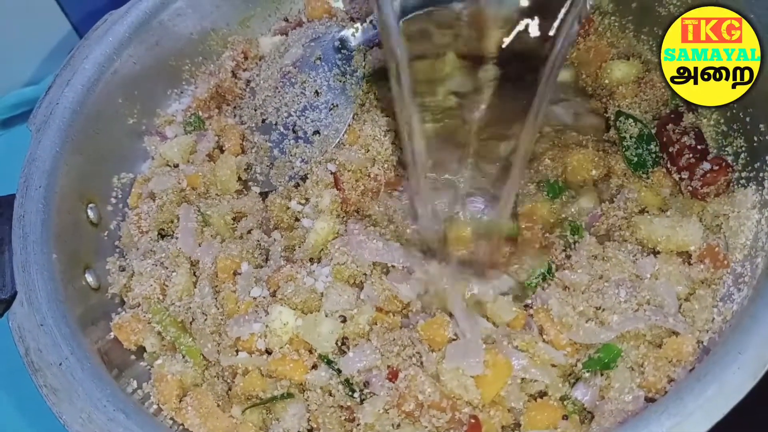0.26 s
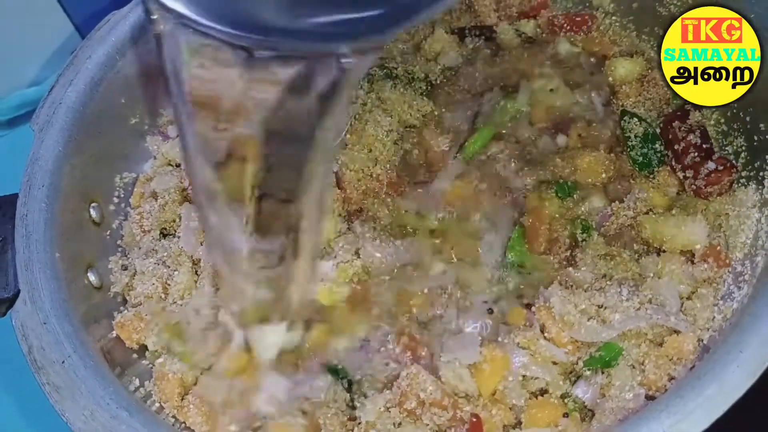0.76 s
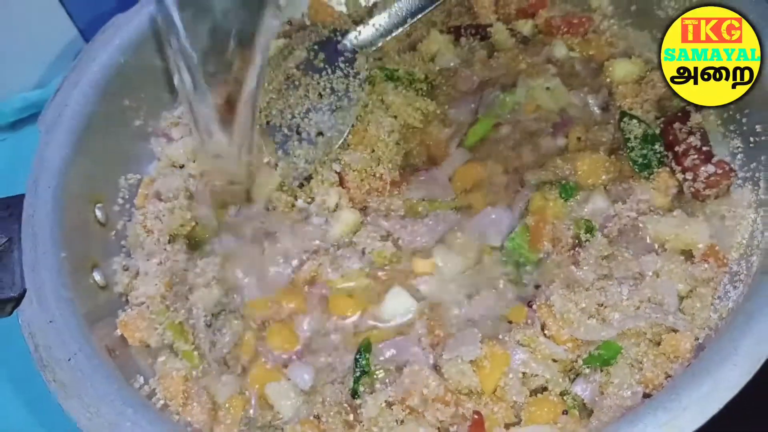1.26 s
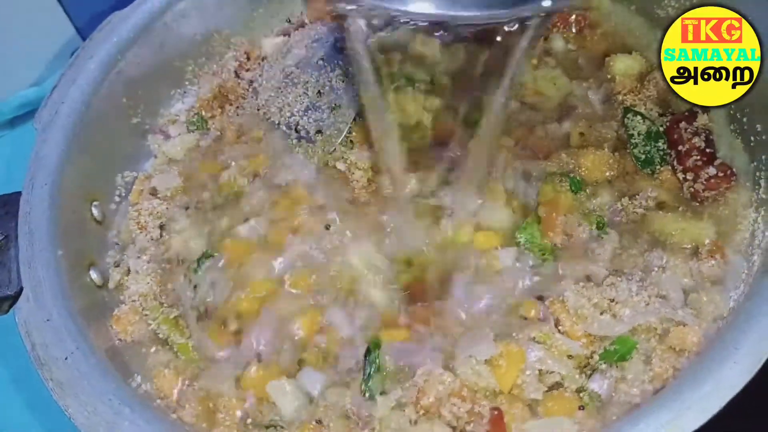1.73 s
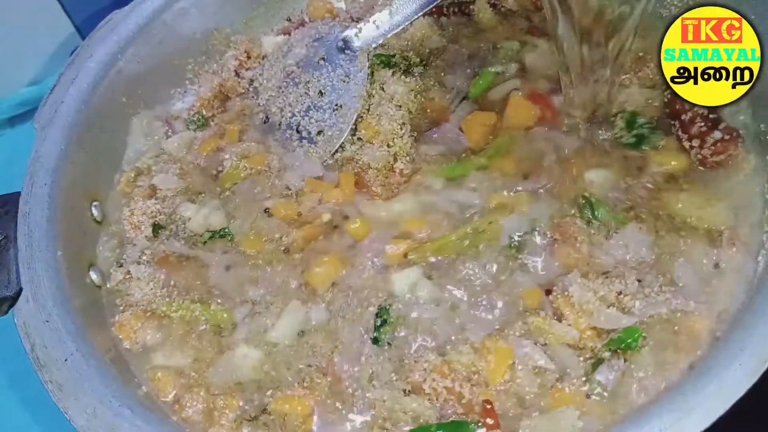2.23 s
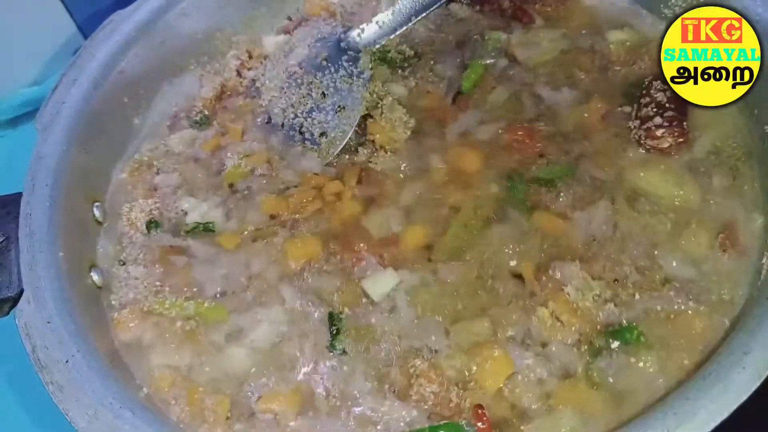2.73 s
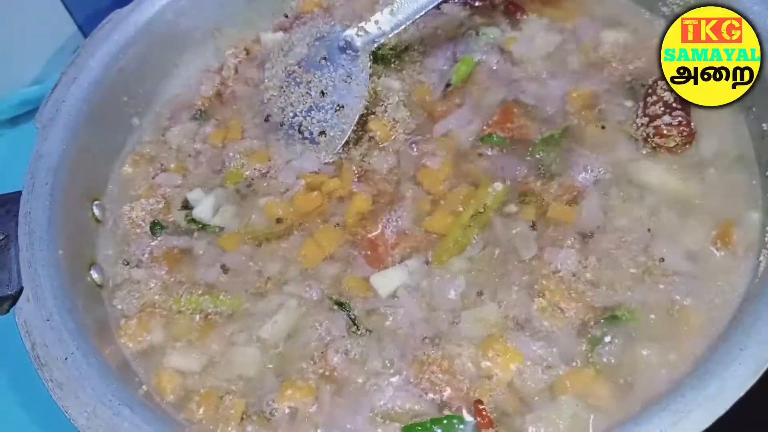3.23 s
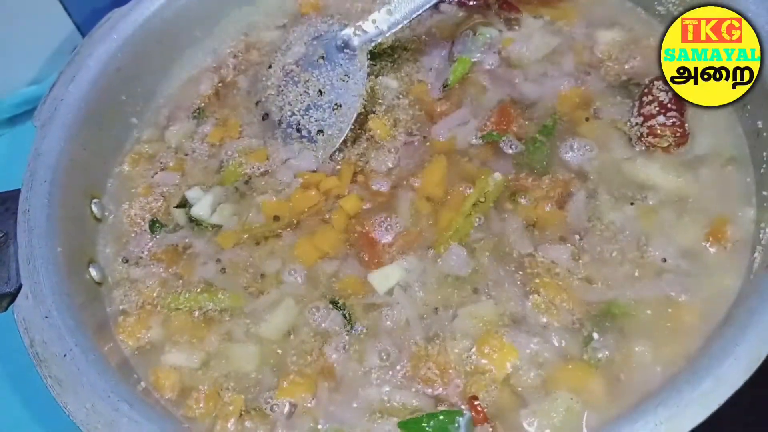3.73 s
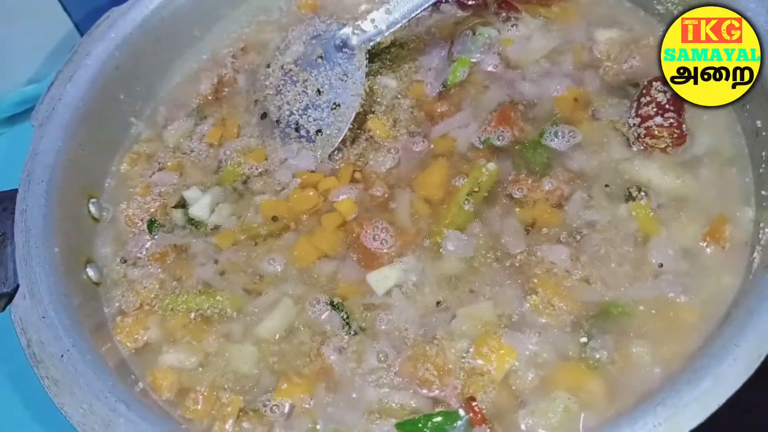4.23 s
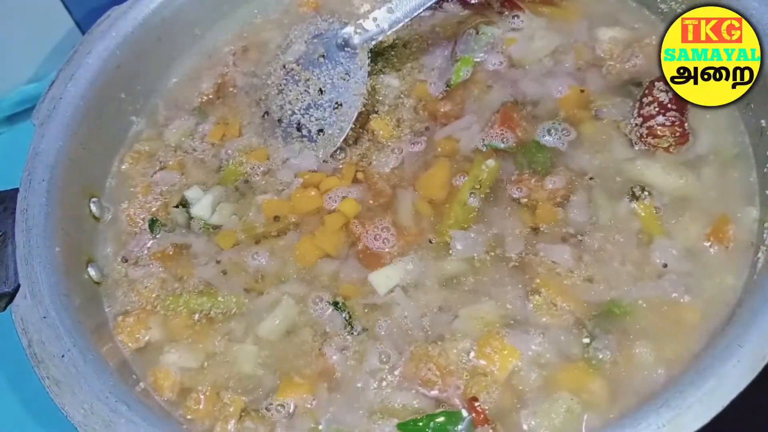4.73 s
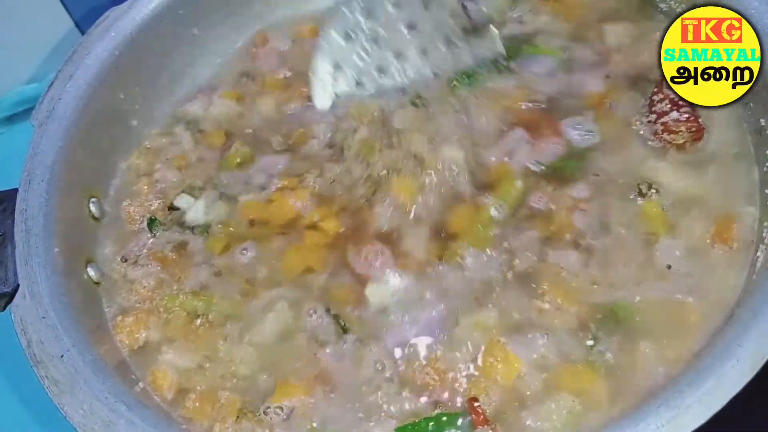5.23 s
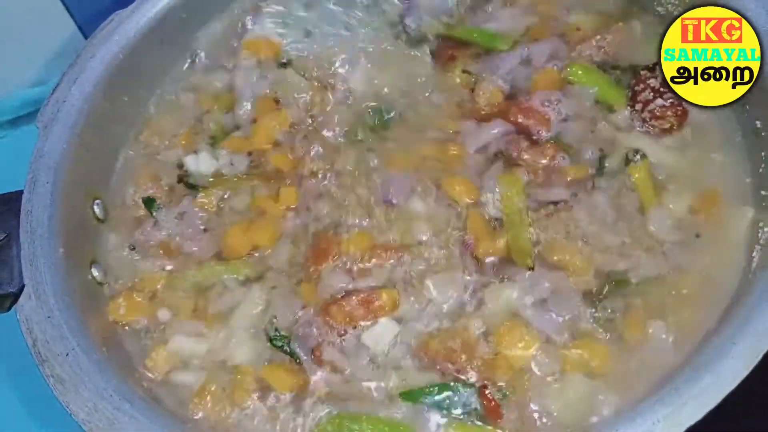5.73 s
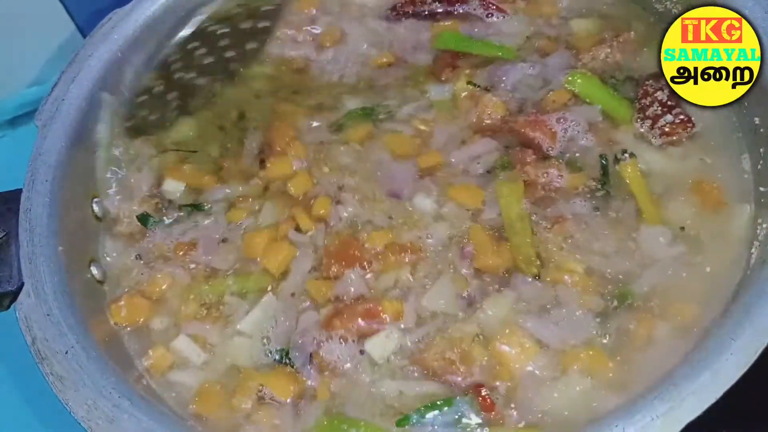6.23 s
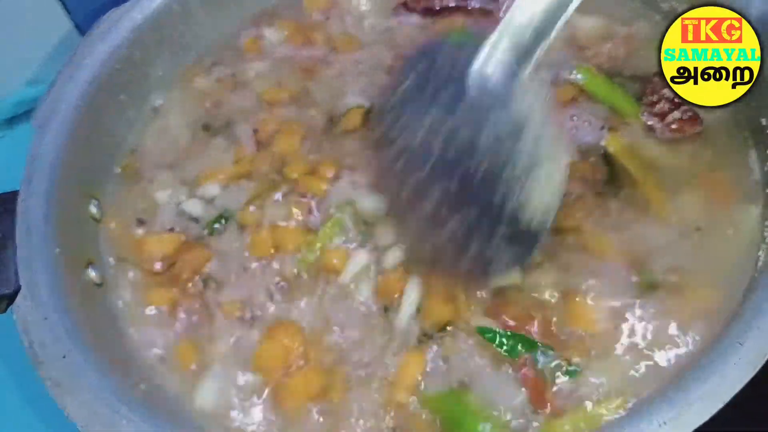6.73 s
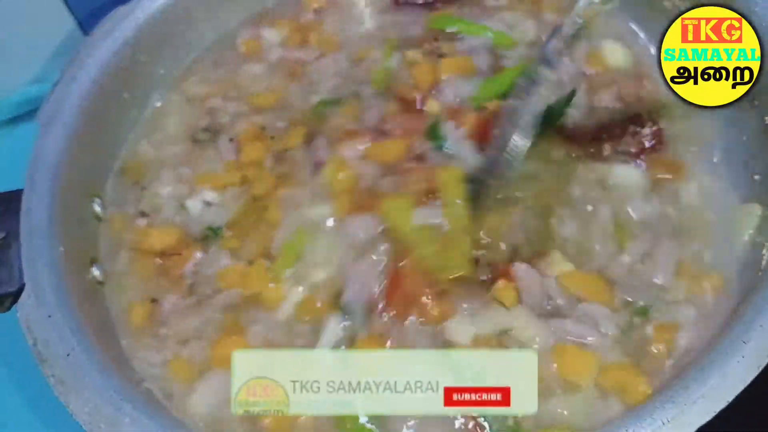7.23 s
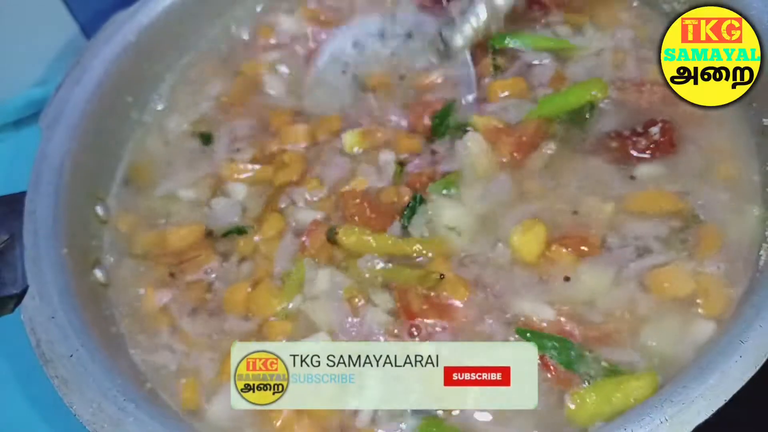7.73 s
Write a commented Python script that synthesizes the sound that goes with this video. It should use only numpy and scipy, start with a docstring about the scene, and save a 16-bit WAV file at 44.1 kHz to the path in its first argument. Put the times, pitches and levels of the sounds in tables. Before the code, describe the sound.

A phone held over the pan hears a bright, dense sizzle under a splashing, bubbling stream for over three seconds. The pour tapers off, leaving near quiet, then a thin metal vessel lands with a rattling clang. Faint watery stirring follows, with dull bumps, a short scrape and hard ladle clanks on the pan wall. Low rumble and a thin burner hiss remain in the live kitchen.

```python
"""Vegetables sizzle in a hot metal pan as water is poured on them: bursts of steam roar, then thin to a simmer.
The stream patters, splashes, slaps, gurgles and drags bubbles under; noise and clicks excite its resonances.
The emptied steel vessel clatters down, and a slotted ladle slops, scrapes, ticks and knocks: cracks and modes.
Dull bumps, rumble, a burner's hiss and room noise fill a small hard-walled kitchen, heard by a phone over the pan."""
import sys
import numpy as np
from scipy import signal
from scipy.fft import rfft, irfft
from scipy.io import wavfile
from scipy.ndimage import uniform_filter1d

SR = 44100
rng = np.random.default_rng(int(sys.argv[2]) if len(sys.argv) > 2 else 0)


def unload_wav(signal):
    """Save mono or channel-first audio to the path in sys.argv[1] as 16-bit WAV at rate SR, clipped to [-1, 1]."""
    wavfile.write(
        sys.argv[1],
        SR,
        np.round(np.clip(np.atleast_2d(signal).T, -1, 1) * 32767).astype(np.int16),
    )


N = 351918
TIME = np.arange(N) / SR
TOP_HZ = 15750  # upper limit of what is heard

# strength of the stream, which builds, tapers as the vessel empties, and trickles out: time_s, level_db
STREAM = [(0, -28.5), (.13, -26), (.25, -26.5), (.35, -24.5), (1.03, -24.5), (1.3, -25), (1.8, -26.5),
          (2.3, -27.5), (2.6, -30), (2.95, -30.5), (3.3, -30.5), (3.5, -33.5), (3.77, -37.5), (3.86, -40),
          (4.2, -46)]
# strokes of the ladle through the broth: middle_s, length_s, slop_db, fresh_sizzle_db
STROKES = [(4.923, 0.32, -55, -65.5), (5.1, 0.11, -54, -61), (5.32, 0.09, -54.5, -72.5),
           (5.46, .09, -59.5, -73), (5.607, 0.1, -60.5, -61.5), (5.805, .07, -56.5, -58.5),
           (5.924, 0.083, -51.5, -52), (6.03, .07, -58.5, -63), (6.72, 0.21, -52.5, -60),
           (6.94, 0.092, -56.5, -69), (7.421, 0.1, -54.5, -68), (7.57, 0.065, -58.5, -65.5),
           (7.694, 0.076, -61.5, -79.5), (7.798, 0.068, -59.5, -80.5), (7.918, 0.06, -61, -85.5)]


def undb(db):
    """Amplitude ratio of a level in decibels."""
    return 10 ** (np.asarray(db) / 20)


def unit(x):
    """Scale to a mean power of 1."""
    return x / np.sqrt(np.mean(x ** 2))


def fade(t, t60):
    """Exponential decay, by 60 dB in t60."""
    return np.exp(-np.log(1000) * t / t60)


def swell(middle, length):
    """A bell-shaped (Gaussian) rise and fall of amplitude."""
    return np.exp(-2 * ((TIME - middle) / length) ** 2)


def curve(rows, axis):
    """Linear interpolation in time of one column of a table."""
    rows = np.asarray(rows)
    return np.interp(TIME, rows[:, 0], rows[:, axis])


def walk(rate):
    """Smoothed random steps, rate a second: a slow fluctuation with a spread near 1."""
    k = int(SR / rate)
    steps = np.repeat(rng.standard_normal(N // k + 1), k)
    return 1.3 * uniform_filter1d(uniform_filter1d(steps, k), k)[:N]


def add(out, s, x):
    """Superpose x on out from time s."""
    i = int(s * SR)
    out[i:i + len(x)] += x[:N - i]


def colour(x, spectrum, tilt_db=0):
    """Minimum-phase filter of unit energy through (hz, db) points, tilted by dB per octave."""
    size = 4096
    octave = np.log2(np.maximum(np.fft.rfftfreq(size, 1 / SR), 1))
    hz, db = np.transpose(spectrum)
    tilt = tilt_db * np.clip(octave, np.log2(hz[0]), np.log2(hz[-1]))
    db = np.interp(octave, np.log2(hz), db) + tilt
    # folding the cepstrum onto positive times makes the response causal
    cepstrum = irfft(np.log(undb(db)))
    cepstrum[1:size // 2] *= 2
    cepstrum[size // 2 + 1:] = 0
    response = irfft(np.exp(rfft(cepstrum)))
    return signal.fftconvolve(x, response / np.linalg.norm(response))[:len(x)]


def pops(rate, spread_db):
    """Poisson-like random clicks, rate a second, mostly small and a few large; mean power 1."""
    sizes = undb(spread_db * np.minimum(rng.exponential(size=N), 5))
    happens = rng.random(N) < rate / SR
    return unit(happens * sizes * rng.choice([-1, 1], N) / np.sqrt(rate))


def rising_tones(count, low_hz, high_hz, cycles, glide):
    """Decaying sines at random times, each rising in pitch by the share glide; mean power 1."""
    out = np.zeros(N)
    for when, pitch, size in rng.random((count, 3)):
        hz = low_hz * (high_hz / low_hz) ** pitch
        age = np.linspace(0, 1, int(SR * cycles / hz))  # fraction of its life
        tone = np.sin(2 * np.pi * cycles * age * (1 + glide * age / 2))
        add(out, when * N / SR, undb(10.3 * size) * fade(age, 1.0) * tone)
    return unit(out)


def room(x, wet_db, t60=0.98, count=40):
    """Reverberation: direct sound plus wall echoes, whose pattern changes as bursts wander over the pan."""
    out, t = np.zeros(N), TIME[:SR // 2]
    for part in np.array_split(np.arange(N), count):
        tail = rng.standard_normal(len(t)) * fade(t, t60) * (t > .004)
        add(out, TIME[part[0]], signal.fftconvolve(x[part], tail / np.linalg.norm(tail)))
    return (x + undb(wet_db) * out) / np.hypot(1, undb(wet_db))


def band(hz, width, wander=0.035):
    """Noise in one resonance (modulated narrow-band noise), whose pitch wanders as the water shifts."""
    low_pass = signal.butter(3, width / 2, fs=SR, output="sos")
    slow = signal.sosfilt(low_pass, rng.standard_normal((2, N)))
    phase = 2 * np.pi * hz * np.cumsum(1 + wander * walk(9)) / SR
    return unit(slow[0] * np.cos(phase) + slow[1] * np.sin(phase))


def ring(modes, tilt_db, split):
    """Modal decay: each mode is a close pair that beats; every blow favours other modes."""
    t = TIME[:SR // 2]
    hz, db, t60 = np.transpose(modes)[:, :, None]
    chance = rng.standard_normal((2, len(modes), 1))
    gains = undb(db + tilt_db * np.log2(hz) + 1.9 * chance[0])
    first, second = 2 * np.pi * rng.random((2, len(modes), 1))
    split_hz = hz * (1 + split * chance[1])
    pair = np.sin(2 * np.pi * hz * t + first) + 0.99 * np.sin(2 * np.pi * split_hz * t + second)
    # each mode builds up over about one cycle
    envelope = fade(t, t60) * (1 - np.exp(-hz * t)) ** 2
    return np.sum(gains * pair * envelope, axis=0) / np.linalg.norm(gains)


def blows(hits, body, modes, crack_t60, wet_db, room_t60, ring_db, split, ripple_db, spot_t60):
    """Impact: a crack of crowded modes, its room echo, a short clang of the struck spot, and lasting modes."""
    out, t = np.zeros(N), TIME[:SR]
    # crowded modes leave peaks and gaps that stay the same from blow to blow
    hz = np.arange(100, TOP_HZ, 70)
    body_hz, body_db = np.transpose(body)
    ripple = ripple_db * np.clip(rng.standard_normal(len(hz)), -2, 1.5) * np.minimum(hz / 1500, 1)
    spectrum = np.column_stack([hz, np.interp(np.log(hz), np.log(body_hz), body_db) + ripple])
    for s, db, tilt_db, lasting_db, spot_hz, spot_db in hits:
        # separate reflections off the hard walls make the echo grainy
        grain = unit(undb(3.5 * np.repeat(rng.standard_normal(SR // 100), 100)))
        echo = undb(wet_db + 0.8 * lasting_db) * fade(t, room_t60) * grain
        envelope = np.hypot(fade(t, crack_t60), echo)
        crack = colour(rng.standard_normal(SR) * envelope, spectrum, tilt_db)
        clang = np.sin(2 * np.pi * spot_hz * t) * fade(t, spot_t60) * (1 - np.exp(-spot_hz * t / 2))
        add(out, s, undb(db) * crack)
        add(out, s, undb(spot_db) * clang)
        add(out, s, undb(db + lasting_db + ring_db) * ring(modes, tilt_db, split))
    return out


def frying():
    """Boiling as shot noise: steam pockets burst on hot metal and, drowned, thin to single crackles."""
    # boiling on the hot metal, drowned as the water rises: time_s, sizzle_db, fine_spray_db
    boil = [(0, -26.5, -36), (.35, -25.5, -36.5), (1.05, -24, -30.5), (1.8, -25.5, -35),
            (2.4, -25.5, -34.5), (3.2, -29, -36), (3.55, -33.5, -41), (4.2, -49.5, -60), (5.05, -55, -67),
            (5.45, -64.5, -73), (6.15, -71.5, -88), (6.7, -58.5, -63.5), (7.0, -64.5, -74),
            (7.4, -58.5, -83), (7.75, -90, -98)]
    # spectra of the sizzle and the fine spray: frequency_hz, density_db_per_hz
    sizzle_spectrum = [(2180, -41), (3700, -12), (4420, -2), (5120, -8), (5990, 1.5), (6910, -5),
                       (8500, -17), (9240, -38), (10000, -37.5), (13000, -45.5), (22000, -120)]
    spray_spectrum = [(5290, -47), (9000, -2.5), (9280, -11), (9900, -3), (11400, -8.5), (14800, 4),
                      (15700, 3)]
    # each stroke of the ladle bares a little hot metal
    bared = sum(undb(db) * swell(s, length) for s, length, _, db in STROKES)
    bared_spray_db = -17  # relative to the bared sizzle
    sizzle_gain = np.hypot(undb(curve(boil, axis=1)), bared)
    spray_gain = np.hypot(undb(curve(boil, axis=2)), undb(bared_spray_db) * bared)
    vigour = sizzle_gain / sizzle_gain.max()
    rate = 3000 + 12000 * vigour  # bursts a second
    sizzle = colour(room(pops(rate, spread_db=2.5), wet_db=-11.0), sizzle_spectrum) * sizzle_gain
    spray = colour(room(pops(rate, spread_db=3.0), wet_db=-6), spray_spectrum) * spray_gain
    # few bursts make an uneven fizz, many a steady roar
    unevenness_db = 0.47 + 0.79 * (1 - vigour) ** 4
    return (sizzle + spray) * undb(unevenness_db * walk(35) + 0.83 * walk(9))


def pouring():
    """Impacts, ringing air pockets and a cavity driven by the stream, which at last trickles out."""
    # spectra of the patter and the splash: frequency_hz, density_db_per_hz
    patter_spectrum = [(850, -39.5), (1450, -9.5), (1530, -14), (1770, -2), (2460, -2.5), (2680, 0),
                       (3080, -5.5), (3360, -2), (3630, -5), (3900, -7), (5070, -33.5), (8580, -120)]
    splash_spectrum = [(130, -38), (220, -27), (318, -13), (377, -21.5), (444, -25), (527, -10),
                       (625, -8.5), (808, -12.5), (903, 0), (1100, 4.5), (1250, 7), (1500, -4.5),
                       (1700, -13.5), (2210, -37.5), (3740, -120)]
    # resonances of the air in the pan, stirred by the stream: frequency_hz, width_hz, level_db
    cavity = [(338, 50, -12.5), (419, 88, -9), (812, 165, 1), (1177, 210, 5.5)]
    stream_db = curve(STREAM, axis=1) + 0.46 * walk(11)
    full_db = max(db for _, db in STREAM)
    # the splash lies 7.5 dB below full flow and loses 1.12 dB per dB of stream
    splash_db = full_db - 7.5 + 1.12 * (stream_db - full_db)
    # the hollow of the pan follows the stream too, and dies away once water covers the base
    covered_s, loss_db_per_s = 1.72, 19
    hollow_db = stream_db - 18 - loss_db_per_s * np.maximum(TIME - covered_s, 0)

    spatter = pops(160, spread_db=2.5) * undb(-9)
    # air pockets dragged under by the stream ring briefly
    small_bubbles = rising_tones(count=5000, low_hz=2217, high_hz=4530, cycles=25, glide=0.059)
    drops = pops(7000, spread_db=1.5) + spatter + undb(-15) * small_bubbles
    patter = unit(colour(room(drops, wet_db=-4.5), patter_spectrum))
    patter = patter * undb(stream_db - 0.54 + 0.35 * walk(30.13))

    large_bubbles = rising_tones(count=2500, low_hz=282.4, high_hz=1756, cycles=14, glide=0.17)
    churn = pops(5000, spread_db=0) + undb(-9.5) * large_bubbles
    splash = unit(colour(room(churn, wet_db=0.5), splash_spectrum))
    splash = splash * undb(splash_db + 0.64 * walk(21.81))

    hollow = sum(undb(db + 1.5 * walk(9)) * band(hz, width) for hz, width, db in cavity)
    trickle = fade(np.maximum(TIME - STREAM[-1][0], 0), 2.6)
    return (patter + splash + hollow * undb(hollow_db)) * trickle


def slapping():
    """Random impacts: fat drops slap and spit on the bare vegetables, until the water covers them."""
    # strength, most at first and again as the stream swings to the dry side: time_s, level_db
    strength = [(0, -27.5), (.24, -29), (.4, -27.5), (.55, -28.5), (.75, -28.5), (1.0, -30.5), (1.5, -41),
                (2.1, -52), (2.45, -41), (2.75, -40), (3.1, -38), (3.6, -52), (4.2, -73)]
    # spectrum of a slap: frequency_hz, density_db_per_hz
    slap_spectrum = [(1500, -31), (2300, -8), (2750, 3), (3100, -0.5), (3450, -4), (4300, 2), (5000, -16.5),
                     (8000, -39)]
    slaps = pops(900, spread_db=2) * undb(1.8 * walk(28))
    return unit(colour(room(slaps, wet_db=-3.5, t60=0.46), slap_spectrum)) * undb(curve(strength, axis=1))


def gurgling(width_share=0.17, rise_per_s=0.25):
    """Cavity resonance: hollows dug by the stream sound for a moment and rise in pitch as they fill."""
    # hollows among the vegetables, which gurgle and spit: middle_s, length_s, pitch_hz, level_db
    gurgles = [(0.09, 0.027, 345.6, -52), (0.4, .08, 3600, -34), (0.43, 0.16, 1164, -31),
               (0.75, 0.13, 2620, -30), (0.97, 0.086, 720, -40), (1.02, 0.15, 901, -37.5),
               (1.36, 0.09, 337.5, -45), (1.499, 0.24, 848, -40.5), (2.0, .08, 610, -50.5),
               (2.25, .07, 642, -48), (2.33, .22, 2150, -36), (2.45, .04, 340, -52),
               (2.58, 0.082, 600, -49.5), (2.68, 0.16, 4450, -31), (2.85, 0.15, 583, -53),
               (2.91, .03, 320, -53), (2.923, 0.11, 1247, -39), (3.15, 0.041, 340, -54),
               (3.285, .04, 400, -51), (3.275, 0.13, 790, -48.5), (3.42, 0.082, 1100, -45),
               (3.692, .05, 329, -56), (3.76, 0.065, 2100, -43), (3.95, 0.024, 1950, -43)]
    out = np.zeros(N)
    for s, length, hz, db in gurgles:
        near = np.abs(TIME - s) < 2 * length
        t = TIME[near] - s
        low_pass = signal.butter(3, width_share * hz / 2, fs=SR, output="sos")
        slow = signal.sosfilt(low_pass, rng.standard_normal((2, SR * 2)))[:, -len(t):]
        phase = 2 * np.pi * hz * t * (1 + rise_per_s * t / 2)
        gurgle = unit(slow[0] * np.cos(phase) + slow[1] * np.sin(phase))
        out[near] += undb(db) * swell(s, length)[near] * gurgle
    return out


def vessel_landing():
    """Repeated impacts on a thin shell: the empty steel vessel lands and rocks, ringing its modes."""
    # blows: start_s, level_db, tilt_db_per_octave, ring_db, spot_pitch_hz, spot_db
    hits = [(4.2855, -15.5, 1.5, -1.5, 647, -23), (4.291, -21, 2, -3.5, 3315, -18.5),
            (4.2995, -14.5, 1.5, -1, 2670, -13.5), (4.319, -17, 2.5, 0, 1775, -11),
            (4.329, -17.5, -0.5, -3.5, 1824, -10), (4.338, -22.5, -0.5, -4, 2600, -21),
            (4.353, -22, 0.5, 1, 1720, -22), (4.376, -22, 1, 2, 2600, -17),
            (4.411, -18.5, -3, -1.5, 178, -28), (4.4225, -18, 3, -3, 3640, -12.5),
            (4.433, -20, 2.5, -1, 1750, -18), (4.449, -24.5, -1.5, 6, 460, -24.5),
            (4.475, -20.5, 0, 1, 1220, -24), (4.496, -21.5, 0.5, -1, 3200, -22),
            (4.522, -19.5, -0.5, -3.5, 248, -28), (4.543, -24, -1, -2, 1180, -25),
            (4.564, -25, -2.5, -8.5, 140, -29), (4.631, -44, -1, -15, 1520, -45)]
    # spectrum of the crack: frequency_hz, density_db_per_hz
    body = [(100, -32), (200, -15), (350, -14.5), (680, -9.5), (880, -19.5), (1140, -6.5), (1450, -6),
            (1790, -2), (2180, -5), (2450, 0.5), (2950, -2.5), (3200, -3.5), (3650, -5.5), (3950, -7.5),
            (4400, -10), (4750, -25), (5400, -15), (7800, -21), (9200, -36.5), (11500, -44), (15300, -34)]
    # lasting modes of the vessel: frequency_hz, level_db, t60_s
    modes = [(336, -21, 0.55), (471, -16, .44), (728, -15, 0.39), (1148, -13.5, 0.51), (1505, -8, .3),
             (1708, -7.5, 0.25), (1765, -3.5, .2), (2095, -9.5, 0.31), (2310, -8.5, 0.31), (2460, -7, 0.32),
             (2610, -5, 0.24), (2710, -1.5, .15), (3120, -3, 0.37), (3180, -5, 0.31), (3320, -9.5, .3),
             (3565, -6, 0.41), (3650, -6.5, .3), (4270, -11.5, 0.34), (5300, -16, 0.74), (5900, -15.5, .37)]
    return blows(hits, body, modes, crack_t60=0.029, wet_db=-4.5, room_t60=0.49, ring_db=-4.5,
                 split=0.0049, ripple_db=1.5, spot_t60=0.086)


def stirring(right_db=10.5):
    """Wet impacts, with short faint tones from 950 to 3100 Hz scattered through the strokes, and gloops."""
    # spectrum of the slop: frequency_hz, density_db_per_hz
    slop_spectrum = [(300, -23), (500, -15), (800, -20), (1060, -4.5), (1350, -10.5), (1600, -9.5),
                     (1950, -0.5), (2200, -3), (2450, 0.5), (2750, 1), (3050, 2.5), (3500, -16),
                     (4000, -21.5), (4500, -7.5), (5200, -17), (8800, -40.5)]
    # air pockets gloop under the gush and behind the ladle: start_s, pitch_hz, level_db
    gloops = [(3.035, 625, -39.5), (3.25, 562, -44), (5.134, 427, -55), (5.3, 654, -59), (5.33, 1050, -55),
              (5.445, 1030, -52), (5.575, 480, -64), (5.585, 1880, -62), (5.742, 626, -64.5),
              (5.774, 2710, -56), (5.88, 380, -53), (5.886, 1100, -57), (5.91, 1430, -60),
              (6.03, 1095, -58), (6.132, 2400, -60), (6.94, 1070, -67.5), (7.56, 1050, -59.5),
              (7.67, 538, -49), (7.72, 597, -53), (7.791, 1050, -59.5)]
    effort = np.sqrt(sum((undb(db) * swell(s, length)) ** 2 for s, length, db, _ in STROKES))
    short_tones = undb(-4) * rising_tones(count=700, low_hz=950, high_hz=3100, cycles=55, glide=0.06)
    short_bubbles = rising_tones(count=3000, low_hz=497, high_hz=3920, cycles=24, glide=0.15)
    smacks = pops(800, spread_db=2.5) + short_tones + undb(-10.5) * short_bubbles
    clumps = undb(3 * walk(60))
    slop = unit(colour(room(smacks * clumps, wet_db=2, t60=0.27), slop_spectrum)) * effort * undb(-5.0)
    t = TIME[:SR // 4]
    for s, hz, db in gloops:
        rising_tone = np.sin(2 * np.pi * hz * t * (1 + 0.32 * t))
        add(slop, s, undb(db) * fade(t, 0.13) * (1 - np.exp(-hz * t / 3)) * rising_tone)
    # heard to the right
    return slop * undb(np.array([[-right_db], [right_db]]) / 2)


def scraping():
    """Stick-slip friction: the ladle's edge catches and slips on the gritty wall in quick, uneven runs."""
    # the ladle slides down the pan wall: time_s, level_db
    slide = [(6.1, -65), (6.2, -60), (6.27, -55), (6.31, -50.5), (6.36, -44.5), (6.41, -47), (6.45, -66)]
    # what the rubbed wall rings with: frequency_hz, density_db_per_hz
    wall = [(700, -29), (1100, -5), (1500, -14), (2200, -1.5), (2750, 2), (3300, -10), (3900, -17),
            (4400, -5), (5400, 1), (6100, -1), (7500, -11), (9300, -26), (12000, -28), (15000, -15)]
    touching = (TIME > slide[0][0]) & (TIME < slide[-1][0])
    slips = pops(1200, spread_db=3) * undb(3 * walk(90))
    return unit(colour(room(slips, wet_db=0, t60=0.33), wall)) * touching * undb(curve(slide, axis=1))


def ladle_ticking():
    """Impact of edge on metal: short cracks, with the ladle's own modes."""
    # blows: start_s, level_db, tilt_db_per_octave, ring_db, spot_pitch_hz, spot_db
    hits = [(5.012, -54, 8.5, -4, 3450, -50), (5.2403, -49, 5.5, -22, 6030, -51.5),
            (5.854, -47, 4, -24, 6000, -54), (6.0395, -53, 1, -19.5, 6120, -55),
            (6.2745, -51, 1, -25.5, 5870, -55), (6.2855, -44, 7.5, -22, 5290, -52),
            (6.418, -19, -1.5, -21, 6200, -24), (6.435, -29, -1.5, -2, 1190, -21),
            (6.586, -43, 6, -17, 6000, -52), (6.678, -45, 24.5, -14.5, 5860, -58),
            (7.045, -15, 3, -13.5, 5750, -15), (7.0485, -20.5, 0, -7.5, 5370, -24),
            (7.385, -49, 12, -12, 6400, -58), (7.5885, -47, 4, -19, 5880, -42.5),
            (7.628, -58, 4.5, -20, 7700, -53)]
    # spectrum of the crack: frequency_hz, density_db_per_hz
    body = [(150, -36), (250, -42), (458, -23), (885, -16), (1190, -7), (2100, -9), (2750, -6),
            (3420, -3.5), (4590, -6.5), (5750, 1.5), (6400, -4.5), (7200, -10), (8710, -16.5), (10500, -34),
            (14600, -20), (15700, -28)]
    # lasting modes of the ladle: frequency_hz, level_db, t60_s
    modes = [(415, -1, 0.35), (715, -13, 0.19), (1228, 1, 0.251), (2330, -7, .22), (2780, -12.5, .25),
             (3424, -1, .24), (3575, -14, .3), (4350, -11, 0.24), (5152, -12, 0.14), (5750, -1.5, 0.12),
             (5950, -0.5, .15), (6800, -3.5, .17), (7600, -9, .13)]
    return blows(hits, body, modes, crack_t60=0.016, wet_db=-4.0, room_t60=0.39, ring_db=2.5,
                 split=0.0033, ripple_db=5.5, spot_t60=0.047)


def pan_knocking():
    """Impact on the pan wall: the ladle knocks and rattles against it, exciting the pan's modes."""
    # blows: start_s, level_db, tilt_db_per_octave, ring_db, spot_pitch_hz, spot_db
    hits = [(6.372, -31.5, 12, -20, 2100, -29.5), (6.3735, -47, -2, -2, 1050, -36),
            (6.4335, -18.5, -2, -8.5, 395, -21), (6.4375, -19, 5, -15.5, 2050, -23),
            (6.484, -32, 3, -2.5, 1200, -32), (6.522, -37, -7, -6, 1215, -26),
            (6.574, -40.5, -5, -3.5, 2040, -43), (6.622, -49, -8.5, -7.5, 460, -40),
            (7.110, -13, 1, -8, 2770, -12), (7.1165, -22.5, -3, -8, 3100, -26),
            (7.125, -17, -1, -11.5, 1290, -28), (7.1395, -29, 0.5, -8, 2110, -28),
            (7.1652, -21, -1, -6.5, 295, -30), (7.175, -24.5, -1, -6, 2320, -26),
            (7.188, -23.5, -2.5, -5, 1330, -15), (7.207, -26, -3, -9, 1260, -17),
            (7.228, -29, -1, -10, 1270, -31)]
    # spectrum of the crack: frequency_hz, density_db_per_hz
    body = [(120, -35.5), (300, -16.5), (520, -12), (720, -8), (1000, -8), (1280, 1), (1500, -7),
            (1900, -5), (2400, -2.5), (3050, -5.5), (3500, -14), (4200, -13.5), (5000, -24), (5900, -15.5),
            (7500, -27), (9200, -45.5), (15700, -52)]
    # lasting modes of the pan: frequency_hz, level_db, t60_s
    modes = [(307, -2.5, .28), (726, -2.5, 0.28), (1120, -7, 0.3), (1262, 2.5, 0.31), (1316, 6, 0.4),
             (1600, -1, .26), (1846, -4, .32), (2030, 4, 0.37), (2115, -2, .33), (2290, 4, 0.37),
             (2450, -5, 0.3), (2710, -2, .24), (3055, -1, 0.37), (3290, 0, .21), (3580, -8, .24),
             (3980, -1, .27)]
    return blows(hits, body, modes, crack_t60=0.027, wet_db=-4, room_t60=0.44, ring_db=-4.5,
                 split=0.014, ripple_db=1.5, spot_t60=0.057)


def bumps(thud_hz=75, thud_t60=0.11, pouring_db=-57, stirring_db=-66, scatter_db=5, modes_db=-1.0,
          boom_t60=0.22, right_db=2.5, pitch_spread=0.06, count=36):
    """Impacts exciting room modes: deep thuds and rough booms; random small booms, louder in the pour."""
    # the loudest dull bumps: start_s, boom_db, thud_db (thuds before a shared gain)
    loudest = [(0.269, -48, -58), (0.38, -47.5, -58), (0.62, -51, -68), (0.885, -46, -66),
               (1.351, -45, -70), (2.081, -41, -64), (2.428, -41, -42), (2.48, -41, -61), (2.549, -43, -61),
               (2.753, -42, -71), (2.893, -42.5, -60), (3.019, -46, -67), (3.13, -44, -68),
               (3.495, -46, -72), (3.53, -50, -72), (3.62, -45, -72), (4.0, -47.5, -64), (4.12, -48, -70),
               (4.725, -39.5, -56), (4.915, -54.5, -59), (5.161, -48.5, -56), (5.312, -44, -48),
               (5.329, -54, -50), (5.965, -62, -52), (6.286, -40.5, -43), (7.55, -55.5, -63),
               (7.665, -48, -46), (7.936, -48.5, -53)]
    # spectrum of the rough boom: frequency_hz, density_db_per_hz
    boom_spectrum = [(50, -26.5), (95, -7), (125, -4), (175, 1), (240, -12.5), (320, -11), (420, -18.5),
                     (600, -20.5), (1200, -44), (3000, -80.5)]
    # the room's low resonances: frequency_hz, level_db, t60_s
    room_modes = [(98.6, -6.5, 0.22), (124.8, -3.5, 0.28), (170.9, 2.5, 0.41), (196, -5, 0.15),
                  (305, -11.5, 0.2)]
    out, t = np.zeros(N), TIME[:SR // 2]
    thud = np.sin(2 * np.pi * thud_hz * t) * fade(t, thud_t60) * (1 - np.exp(-2 * thud_hz * t))

    def boom():
        """Decaying noise plus room modes, a little higher or lower for each bump."""
        rough = colour(rng.standard_normal(len(t)) * fade(t, boom_t60), boom_spectrum)
        modes = np.array(room_modes) * [1 + pitch_spread * rng.uniform(-1, 1), 1, 1]
        return rough * undb(-3.5) + undb(modes_db) * ring(modes, 0, split=0.05)

    for s, boom_db, thud_db in loudest:
        add(out, s, undb(boom_db) * boom() + undb(thud_db + 8.0) * thud)
    # one small boom at a random moment of each equal slot
    for k, (when, size) in enumerate(rng.random((count, 2))):
        s = (k + when) / count * TIME[-1]
        db = pouring_db if s < STREAM[-1][0] else stirring_db
        add(out, s, undb(db + scatter_db * size) * boom())
    return out * undb(np.array([[-right_db], [right_db]]) / 2)


def rumble():
    """Low-frequency filtered noise whose level wavers."""
    # spectrum: frequency_hz, density_db_per_hz
    spectrum = [(12, -51.5), (20, -36), (32, -45.5), (97, -3), (130, -6.5), (146, -6), (199, -7.5),
                (240, -32), (310, -35.5), (530, -120)]
    return colour(rng.standard_normal(N), spectrum) * undb(-66.0 + 4.8 * walk(12))


def burner():
    """Filtered noise: the thin, steady hiss of the burner."""
    # spectrum: frequency_hz, density_db_per_hz
    spectrum = [(2940, -64), (5000, -37.5), (6920, 4), (7730, 8.5), (8280, 3), (8960, -50), (9110, -57.5),
                (10000, -40), (13000, -74), (22000, -120)]
    return colour(rng.standard_normal(N), spectrum) * undb(-63.0 + .5 * walk(6.2))


def room_noise():
    """Partly coherent noise: air mostly from the right, and a diffuse part of opposite sign left and right."""
    # spectra of the shared and the diffuse noise: frequency_hz, density_db_per_hz
    air_spectrum = [(220, -4), (320, 9.5), (500, -8.5), (620, -1.5), (780, -8.5), (1080, -2), (1500, -15.5),
                    (2000, -9.5), (2700, -23), (3500, -37), (5000, -40.5)]
    diffuse_spectrum = [(40, -6.5), (110, -1.5), (200, -2), (330, 7), (520, -9), (800, -3.5), (1150, -19.5),
                        (1600, -22.5), (2400, -41.5), (3800, -40.5), (4450, -24), (6000, -25),
                        (9000, -29.5), (14500, -29)]
    air = colour(rng.standard_normal(N), air_spectrum) * undb(-65.5 + 4.1 * walk(14))
    diffuse = colour(rng.standard_normal(N), diffuse_spectrum) * undb(-70.5 + 1.5 * walk(12))
    return np.array([undb(-3.5) * air + diffuse, undb(2.0) * air - diffuse])


def scene():
    """Superposition of all sources, with the pan straight ahead."""
    water = pouring() + slapping() + gurgling()
    ladle = stirring() + scraping() + ladle_ticking() + pan_knocking()
    background = rumble() + burner() + room_noise()
    return frying() + water + vessel_landing() + ladle + bumps() + background


def record(dry):
    """Band limiting: the phone thins the deep bass and cuts the top."""
    low_cut_hz = 52
    thin = signal.sosfilt(signal.butter(2, low_cut_hz, "highpass", fs=SR, output="sos"), dry)
    return signal.sosfilt(signal.ellip(10, .2, 70, TOP_HZ, fs=SR, output="sos"), thin)


dry = scene()
out = record(dry)
unload_wav(out)
```